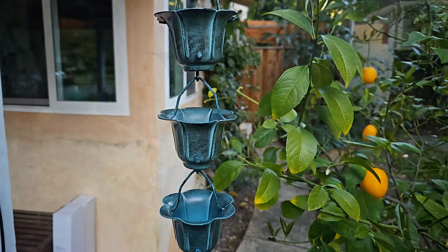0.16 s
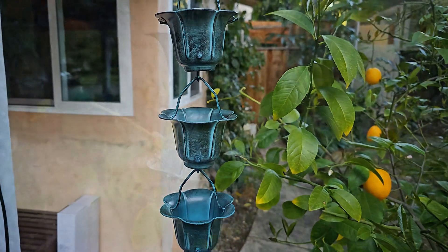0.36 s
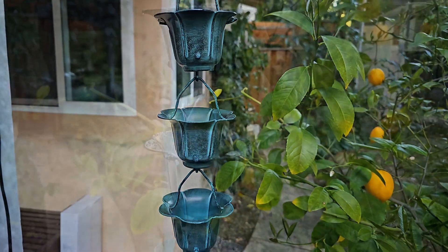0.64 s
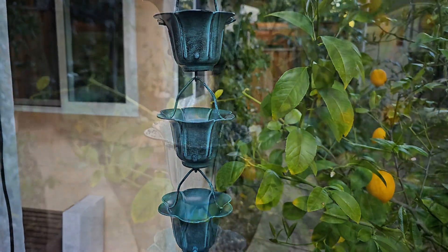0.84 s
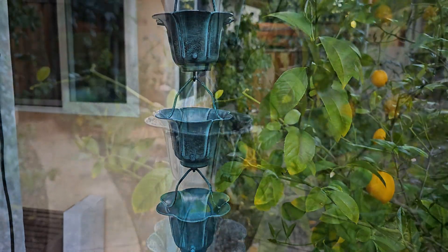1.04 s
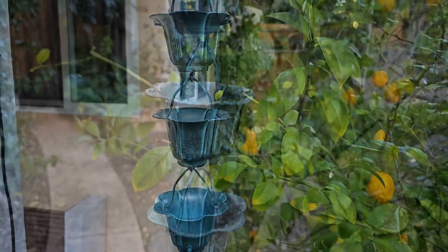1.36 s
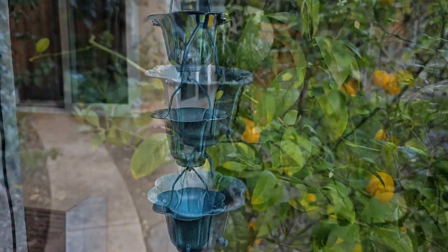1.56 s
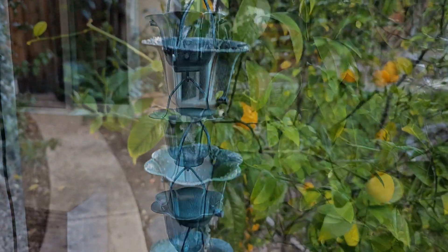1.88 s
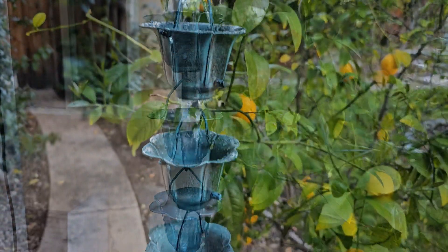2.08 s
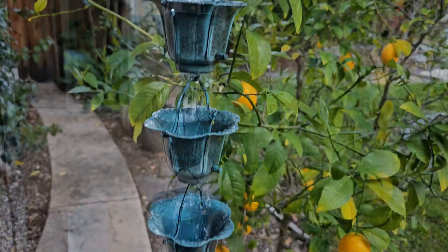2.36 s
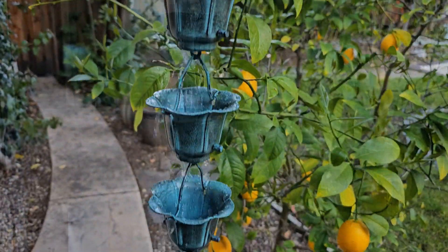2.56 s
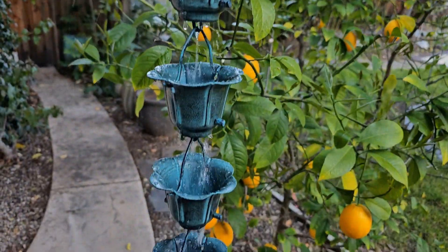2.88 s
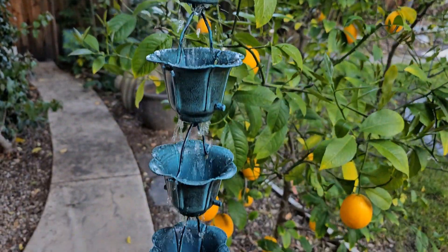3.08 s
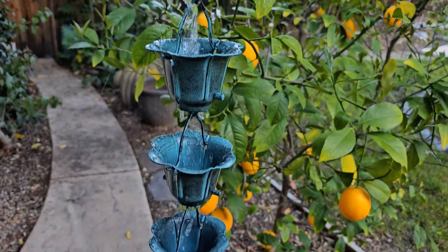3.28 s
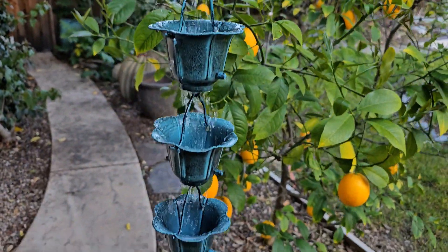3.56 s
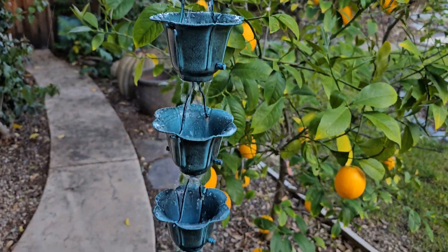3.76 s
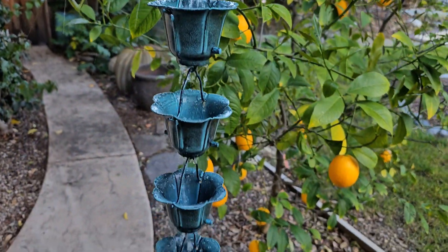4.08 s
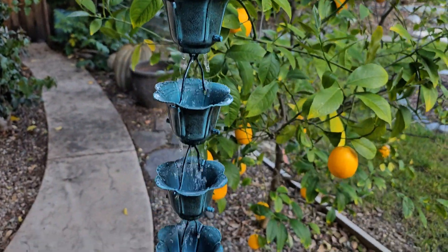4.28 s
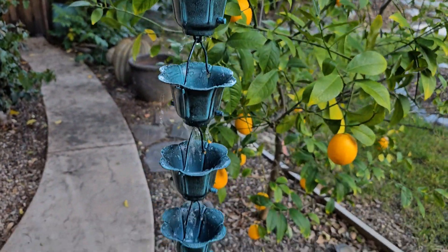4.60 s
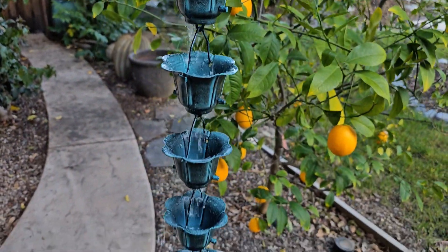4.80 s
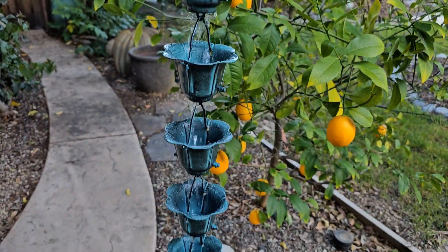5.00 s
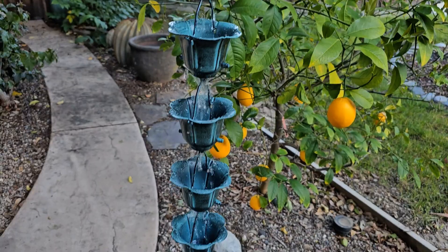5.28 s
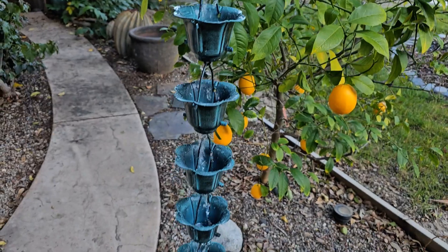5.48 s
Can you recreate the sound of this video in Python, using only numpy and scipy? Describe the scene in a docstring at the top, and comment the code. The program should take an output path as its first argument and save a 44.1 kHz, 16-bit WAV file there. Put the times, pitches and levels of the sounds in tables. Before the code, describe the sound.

A thin trickle runs down a hanging chain of metal cups close to the microphone in a garden. Throughout, crisp, irregular drips slap the wet metal among tiny high plips, fine spray and a faint hiss. The stream swells briefly at about 1.4 and 2.2 seconds, and one sharper drip stands out at 3.3 seconds. More surges come between 4.4 and 5.2 seconds, with water spattering on the ground slightly to the right just after 5 seconds.

Underneath is the steady low hum of a town. A distant engine drones, dropping in pitch over the first second, climbing gradually until about 5 seconds, then dipping again. A breeze rumbles on the microphone, mostly on the left, with soft low thumps at about 0.1 and 1.3 seconds and weaker gusts afterwards.

```python
"""A thin trickle runs down a hanging chain of metal cups, close to the microphone in a garden.
Drops slap the wet metal and trapped bubbles plip over a fine spray; now and then the stream
surges and spills onto the ground. Far off, an engine's exhaust drones over the hum of the town,
slowing and then pulling away. A breeze nudges the microphone, mostly on its left port."""
import sys
import numpy as np
from scipy import signal
from scipy.fft import rfft, irfft
from scipy.io import wavfile
from scipy.ndimage import uniform_filter1d

SR = 44100
rng = np.random.default_rng(int(sys.argv[2]) if len(sys.argv) > 2 else 0)


def transcribe(signal):
    """Save signal, clipped to [-1, 1], as a 16-bit WAV file at the path in sys.argv[1]."""
    frames = np.atleast_2d(signal).T
    limited = np.clip(frames, -1, 1)
    pcm = np.round(limited * 32767).astype(np.int16)
    wavfile.write(sys.argv[1], SR, pcm)


N = 248724

# loudest drops in the cups: start_s, level_db, pitch_hz, splash_db (higher is a harder landing), left_db
CLOSE_DROPS = [(0.1047, -50.5, 7900, -1.5, -2), (0.1928, -48.5, 6040, 3.5, -1),
               (0.217, -47.5, 1540, -2, -1), (0.218, -47.5, 2900, -11, -13), (0.238, -42.5, 6400, -6.5, 2),
               (0.379, -48, 10400, -24, -11), (0.5178, -51, 12900, -4, -3), (0.7539, -51.5, 6020, -5, 1),
               (0.834, -46.5, 12920, -12, -3), (0.9378, -45, 14500, -22, -9), (1.1664, -53, 12300, 2, -2),
               (1.4265, -55, 7402, 7, -4), (1.6408, -50, 11840, -9, -9), (1.9877, -55.5, 3800, -12, -8),
               (2.082, -54, 7610, 4, -5), (2.1973, -51.5, 7504, 6, -1), (2.2035, -45, 6840, -5, 0),
               (2.2281, -57, 7200, -1, -6), (2.273, -51.5, 11540, -21, -9), (2.297, -49, 3620, -7, -7),
               (2.3341, -57, 7666, 4.5, -4), (2.596, -60.5, 5462, -26, 2), (2.9061, -49, 12600, -23, 1),
               (2.9435, -50, 15100, -2, 3), (3.1969, -55, 7580, 5, -3), (3.254, -53, 4300, -23, -1),
               (3.3209, -36, 5093, -4, -2), (3.391, -52, 1797, -12, -2), (3.5825, -50.5, 8107, 3.5, -4),
               (3.7427, -48.5, 3860, -7, -7), (3.814, -49.5, 5370, -16, 5), (3.8696, -48, 14320, -12, -9),
               (4.364, -53, 4760, 4, -4.5), (4.367, -46.5, 15000, -2.5, 0), (4.3769, -54, 2152, -6, -12),
               (4.5508, -49.5, 2060, 0, -5), (4.7047, -43, 13440, -15, 3), (4.8481, -50.5, 3505, -7.5, -10),
               (5.1254, -47.5, 2064, -5, -11), (5.2391, -54, 2080, 5.5, -4), (5.2661, -48, 12020, -12, 1),
               (5.3813, -54, 4770, -2, 2), (5.4424, -52.5, 11730, -1, -4)]
# colour of the fine splashes on the cup rims: frequency_hz, gain_db
RIM_SPECTRUM = [(1500, -21), (3000, -4), (5000, -3.5), (7500, -7), (11000, -10), (16000, -4)]
# surges of the stream: peak_s, added_flow_db (against the steady trickle)
STREAM_SURGES = [(1.42, -3), (2.23, 2), (3.34, -6), (4.38, 2), (4.82, 3), (5.15, 4), (5.55, -5)]
# overflows landing on the ground: peak_s, level_db, rise_s
GROUND_SPILLS = [(4.39, -67, 0.049), (5.06, -58, 0.066), (5.175, -54, .07), (5.5, -71, 0.051)]
# colour of the spatter on the ground: frequency_hz, gain_db
SPATTER_SPECTRUM = [(600, -8), (1200, -4.5), (2050, 1.5), (2700, -20), (3250, -1), (3800, -13.5),
                    (4800, -8), (8000, -26), (16000, -17)]
# distant engine: time_s, firing_hz, level_db
ENGINE_RUN = [(0, 91.64, -42.5), (.3, 85, -38.5), (.5, 76.67, -52), (.65, 68.8, -43), (.9, 63.97, -53.5),
              (1.1, 61.16, -49.5), (1.42, 63.23, -36), (1.6, 66.3, -40.5), (1.85, 68.84, -33.5),
              (2.0, 71.48, -36.5), (2.25, 74, -37.5), (2.7, 80.54, -43), (3.15, 84.48, -43.5),
              (3.5, 87.2, -37.5), (4.3, 92.9, -39), (5.1, 96.08, -40.5), (5.35, 91.67, -35.5),
              (5.64, 78.6, -37.5)]
# resonances of the exhaust and its path through the yard: frequency_hz, gain_db
EXHAUST_RESPONSE = [(60, -7.5), (66, -1), (69, -24), (75, -2), (96, 0.5), (110, -10), (126, -0.5),
                    (132, -1.5), (138, 1.5), (146, -5.5), (160, -12), (172, -12), (180, -25.5), (200, -24),
                    (220, -21), (263, -17), (275, -28.5), (292, -23), (330, -34)]
# colour of the town's hum: frequency_hz, gain_db
TOWN_SPECTRUM = [(20, -3), (45, -3), (70, 5), (105, -3), (135, 0.5), (185, -9.5), (265, -8.5), (345, -21.5),
                 (600, -19.5), (1150, -23.5), (1700, -22), (2050, -28.5), (2600, -40.5), (5000, -47)]
# likeness of the town's hum in left and right: frequency_hz, correlation
TOWN_LIKENESS = [(20, 0.82), (100, 0.97), (200, 0.63), (350, 0.66), (700, 0.27), (1300, -0.16),
                 (3000, -0.036)]
# colour of the hiss of far water and air: frequency_hz, gain_db
HISS_SPECTRUM = [(1200, -28), (2600, 2), (4200, -1.5), (6000, -4), (8000, 3), (12000, -1.5), (16000, -1.5)]
# gusts on the microphone: peak_s, level_db, rise_and_fall_s
MIC_GUSTS = [(.16, -34, 0.13), (.65, -37, 0.11), (1.42, -36, .18), (1.8, -41, 0.35), (2.3, -41, .12),
             (3.85, -45.5, 0.19), (5.3, -43.5, 0.24)]
# puffs of air on the left port: centre_s, level_db, swing_hz
LEFT_PUFFS = [(0.117, -17.5, 24.3), (1.344, -26, 20)]
# colour of the microphone ports: frequency_hz, left_db, right_db
PORT_RESPONSE = [(2390, 3, 2.5), (3270, -0.5, 2.5), (4040, 1, 1.5), (5250, 7, -0.5), (4950, 5.5, 5.5),
                 (6270, -0.5, 7), (7320, 3, 1), (7000, 4, 10), (8360, -4, 3), (9100, -6, -1.5),
                 (9670, -26, 6), (9230, -37, -6.5), (10400, -31, -3.5), (11660, 5.5, 12.5),
                 (11870, -2.5, 0.5), (13000, 3.5, 8.5), (14800, 7.5, -5.5), (15500, 4, 10)]


def drops(rows, ring_db=2, splash_boost_db=3.5, tick_db=-4, overtone=1.27, overtone_db=-2):
    """Close up, each drop slaps the wet metal: a crisp tick, a pitched splash, a brief two-note ring."""
    out, t = np.zeros((2, N)), np.arange(SR // 100) / SR
    for start_s, level_db, hz, splash_db, left_db in rows:
        tick = unit(band(rng.standard_normal((2, len(t))), 3800, 13600)) * np.exp(-t / 0.00047)
        slap = unit(band(rng.standard_normal((2, len(t))), hz / 1.5, hz * 1.5)) * np.exp(-t / 0.0014)
        splash = undb(splash_db + splash_boost_db) * (slap + undb(tick_db) * tick)
        life_s = 0.00028 * np.sqrt(5000 / hz)  # small, high bubbles die sooner
        # a soft landing of a big drop rings longer and purer
        softness = min(undb(-splash_db) / 6, 2.4) * min(9000 / hz, 1)
        note = bubble(t, hz, life_s * (1 + softness), glide=0.0008)
        note += undb(overtone_db - 6.1 * softness) * bubble(t, hz * overtone, life_s, glide=0)
        add(out, start_s, undb(level_db) * (undb(ring_db) * note + splash), left_db)
    return out


def faint_drops(per_s=7, level_db=-58, lo_hz=5500, hi_hz=15500):
    """Smaller drops land in the cups further along the chain, at random times and pitches."""
    count = int(per_s * N / SR)
    when, pitch = rng.random((count, 2)).T
    size, splash, side = np.clip(rng.standard_normal((count, 3)), -1.5, 1.5).T
    pitch_hz = lo_hz * (hi_hz / lo_hz) ** pitch
    splash_db, left_db = -8 + 8 * splash, -3 + 4 * side
    return drops(np.column_stack([when * N / SR, level_db + 2.5 * size, pitch_hz, splash_db, left_db]))


def bubble(t, hz, life_s, glide):
    """A trapped bubble swells and dies, gliding upward; the two ports hear it slightly out of step."""
    phase = 2 * np.pi * hz * t * (1 + glide * t / life_s)
    lag = rng.uniform(-np.pi / 3, np.pi / 3) * np.array([[0], [1]])
    return t / life_s * np.exp(1 - t / life_s) * np.sin(phase + lag)


def trickle(plips_db=-79, spray_db=-73, rims_db=-77, spurt_db=4.5):
    """The thin stream comes in spurts and breaks into small plips, finer spray and ticks on the rims."""
    plips = droplets(per_s=60, lo_hz=2810, hi_hz=8420, life_s=0.0005, spread_db=-1, left_db=4.5)
    spray = droplets(per_s=170, lo_hz=6930, hi_hz=16100, life_s=0.00026, spread_db=0.5, left_db=2)
    rims = patter(per_s=87, spread_db=0, spectrum=RIM_SPECTRUM)
    spurts = unit(undb(spurt_db * np.clip(wander(20), -2, 2)))
    return flow() * spurts * (undb(plips_db) * plips + undb(spray_db) * spray + undb(rims_db) * rims)


def flow():
    """Strength of the stream: steady at 1, with brief surges."""
    return 1 + sum(swell(peak_s, db, rise_s=0.029, fall_s=0.029) for peak_s, db in STREAM_SURGES)


def droplets(per_s, lo_hz, hi_hz, life_s, spread_db, left_db):
    """Tiny bubbles ring at random times, pitches and lengths."""
    out, t = np.zeros((2, N)), np.arange(SR // 120) / SR
    for when, pitch, size, life, side in rng.random((int(per_s * N / SR), 5)):
        hz = lo_hz * (hi_hz / lo_hz) ** pitch
        note = bubble(t, hz, life_s * 4 ** (2 * life - 1), glide=0.006)
        level_db = spread_db * min(-np.log(size), 3) - 6 * life  # longer notes start softer
        add(out, when * N / SR, undb(level_db) * note, left_db + 10 * (side - .5))
    return unit(out)


def patter(per_s, spread_db, spectrum):
    """Water strikes a surface in random clicks of uneven size."""
    hits = rng.random(N) < per_s / SR
    sizes = undb(spread_db * np.minimum(rng.exponential(1, N), 2.5))
    return unit(colour(hits * sizes * rng.standard_normal((2, N)), spectrum))


def spill(left_db=-6, gurgle_db=-1, dribble_db=-76.5):
    """Water that misses the cups spatters on the ground to the right, building up and stopping short."""
    clicks = patter(per_s=700, spread_db=-1, spectrum=SPATTER_SPECTRUM)
    gurgle = droplets(per_s=200, lo_hz=1396, hi_hz=3535, life_s=0.00048, spread_db=2, left_db=1.5)
    overflow = sum(swell(peak_s, db, rise_s, fall_s=0.023) for peak_s, db, rise_s in GROUND_SPILLS)
    return pan(unit(clicks + undb(gurgle_db) * gurgle) * (undb(dribble_db) + overflow), left_db)


def garden_echo(x, wet_db=-13, t60_s=0.073, build_up_s=0.008):
    """Cups, wall and leaves scatter each drop into a short, faint tail."""
    t = np.arange(SR // 3) / SR
    envelope = np.minimum(t / build_up_s, 1) * np.exp(-np.log(1000) * t / t60_s)
    echo = band(rng.standard_normal((2, len(t))), 1340, 5800) * envelope
    echo /= np.sqrt(np.sum(echo ** 2, axis=1, keepdims=True))
    return x + undb(wet_db) * signal.fftconvolve(x, echo, axes=1)[:, :N]


def distant_engine(half_order_db=-19, waver_db=1.3, wobble=0.004):
    """Far off, low exhaust harmonics swell and fade as they glide through fixed resonances."""
    firing_hz, level_db = over_time(ENGINE_RUN)
    phase = 2 * np.pi * np.cumsum(firing_hz * (1 + wobble * wander(12))) / SR
    out = 0
    for order in (1, 1.5, 2, 3, 4):  # unequal cylinders give the half order
        resonance_db = np.interp(order * firing_hz, *np.transpose(EXHAUST_RESPONSE))
        order_db = level_db + resonance_db + (half_order_db if order % 1 else 0)
        out += undb(order_db + waver_db * wander(12)) * np.sin(order * phase)
    return out


def town_hum(level_db=-45.5, waver_db=0.51):
    """The town hums beyond the garden, alike on both sides in the bass and wider above."""
    mid, side = rfft(rng.standard_normal((2, N)))
    likeness = over_bins(TOWN_LIKENESS)
    hum = irfft(mid * np.sqrt(1 + likeness) + side * np.sqrt(1 - likeness) * np.array([[1], [-1]]), N)
    return unit(colour(hum, TOWN_SPECTRUM)) * undb(level_db + waver_db * wander(3.008))


def air(hiss_db=-65, flow_power=0.77, whine_hz=7930, whine_db=-80):
    """A hiss of far water and air rises with the stream, beside a faint, thin whine."""
    hiss = unit(colour(rng.standard_normal((2, N)), HISS_SPECTRUM)) * flow() ** flow_power
    whine = unit(band(rng.standard_normal((2, N)), whine_hz - 20, whine_hz + 20))
    return undb(hiss_db) * hiss + undb(whine_db + 2 * wander(2.2)) * whine


def breeze(calm_db=-58.5, right_db=-9, puff_s=0.012):
    """Slow eddies push on the microphone ports in gusts, mostly on the left one."""
    strength = undb(calm_db) + sum(swell(peak_s, db, ramp_s, ramp_s) for peak_s, db, ramp_s in MIC_GUSTS)
    eddies = unit(band(rng.standard_normal((2, N)), 4.3, 41))
    out = eddies * strength * undb([[0], [right_db]])
    for centre_s, level_db, swing_hz in LEFT_PUFFS:
        t = np.arange(N) / SR - centre_s
        out[0] -= undb(level_db) * np.exp(-(t / puff_s) ** 2 / 2) * np.sin(2 * np.pi * swing_hz * t)
    return out


def undb(db):
    """Decibels to gain."""
    return 10 ** (np.asarray(db) / 20)


def unit(x):
    """Scale to rms 1."""
    return x / np.sqrt(np.mean(x ** 2))


def over_time(table):
    """Each column of a time table, sample by sample."""
    time_s, *columns = np.transpose(table)
    return [np.interp(np.arange(N) / SR, time_s, column) for column in columns]


def over_bins(points):
    """Points of frequency_hz, value joined on a log-frequency axis."""
    hz, value = np.transpose(points)
    return np.interp(np.log(np.arange(N // 2 + 1) * SR / N + 1), np.log(hz), value)


def colour(x, points):
    """Minimum-phase filter through points of frequency_hz, gain_db."""
    cepstrum = irfft(np.log(undb(over_bins(points))), N)
    cepstrum[1:N // 2] *= 2
    cepstrum[N // 2 + 1:] = 0
    return irfft(rfft(x) * np.exp(rfft(cepstrum)), N)


def band(x, lo_hz, hi_hz):
    """Gentle band-pass."""
    sos = signal.butter(2, [lo_hz, min(hi_hz, SR / 2 - 1)], "band", fs=SR, output="sos")
    return signal.sosfilt(sos, x)


def wander(rate_hz):
    """Smooth random drift with rms 1."""
    hold = int(SR / rate_hz)
    steps = np.repeat(rng.standard_normal(N // hold + 1), hold)
    return unit(uniform_filter1d(uniform_filter1d(steps, hold), hold)[:N])


def swell(peak_s, db, rise_s, fall_s):
    """A gain that grows exponentially to its peak and dies away."""
    t = np.arange(N) / SR - peak_s
    return undb(db) * np.exp(-np.maximum(-t / rise_s, t / fall_s))


def pan(sound, left_db):
    """Set the left channel left_db above the right."""
    return sound * undb([[left_db / 2], [-left_db / 2]])


def add(out, start_s, sound, left_db):
    """Mix a sound in at start_s, leaning left or right."""
    i = int(np.clip(start_s * SR, 0, N - 1))
    out[:, i:i + sound.shape[-1]] += pan(sound, left_db)[:, :N - i]


def scene():
    """Water close in front, engine and town far behind, breeze on the microphone."""
    water = drops(CLOSE_DROPS) + faint_drops() + trickle() + spill()
    return garden_echo(water) + distant_engine() + town_hum() + air() + breeze()


def record(dry, top_hz=15720):
    """Each microphone port has its own treble notch; the recorder cuts the top."""
    hz, *ports_db = np.transpose(PORT_RESPONSE)
    heard = np.array([colour(x, np.column_stack([hz, db])) for x, db in zip(dry, ports_db)])
    return signal.sosfilt(signal.ellip(10, .2, 80, top_hz, fs=SR, output="sos"), heard)


dry = scene()
out = record(dry)
transcribe(out)
```